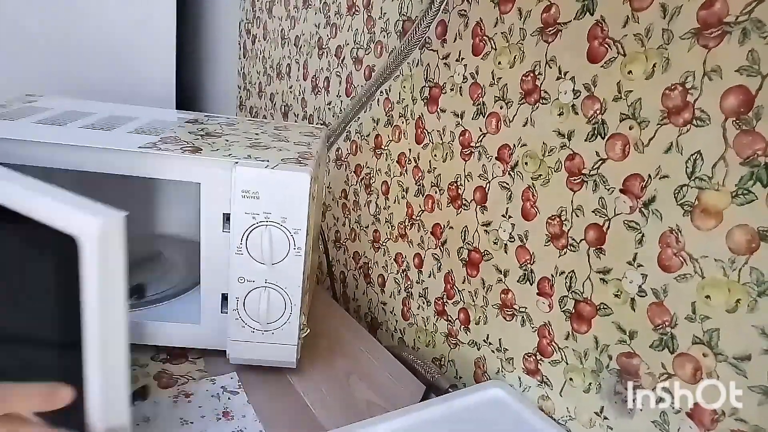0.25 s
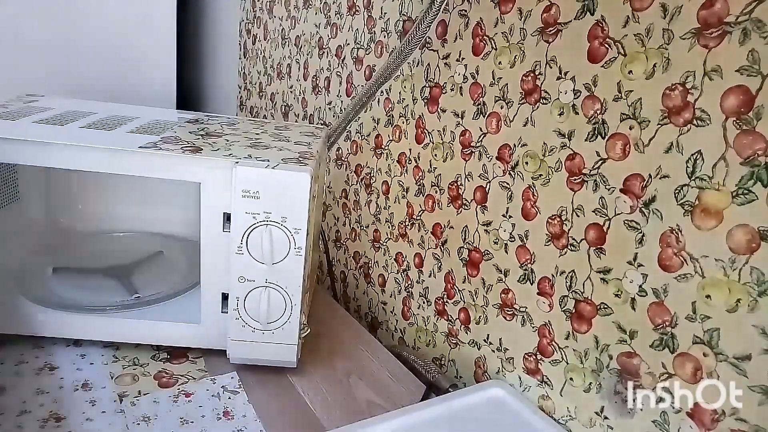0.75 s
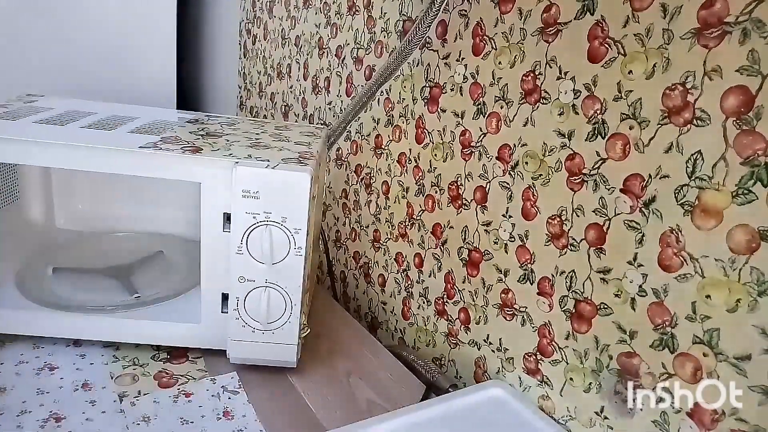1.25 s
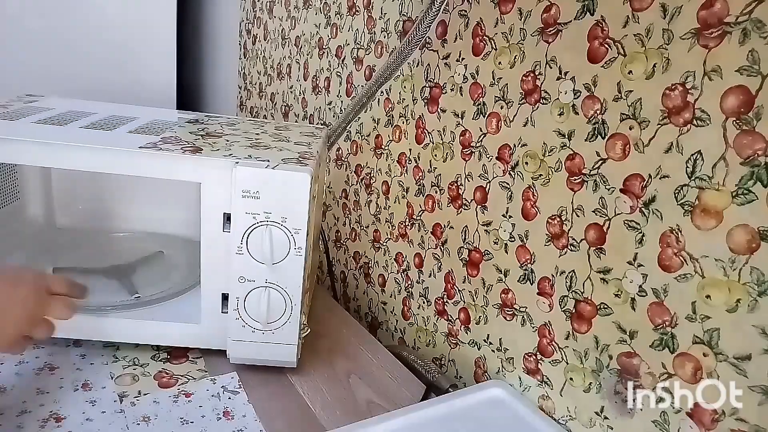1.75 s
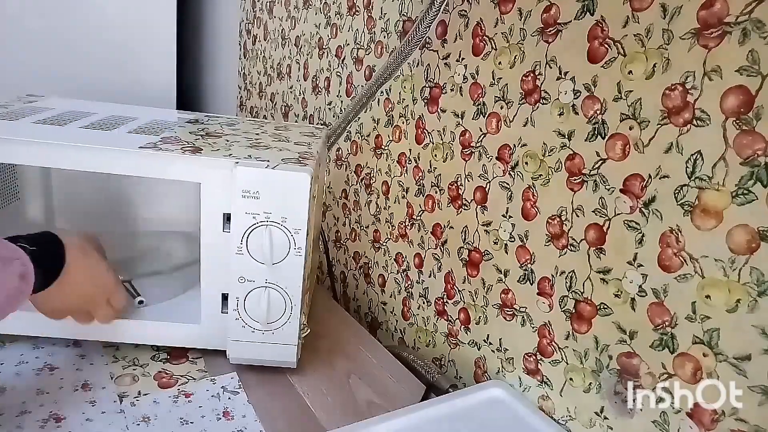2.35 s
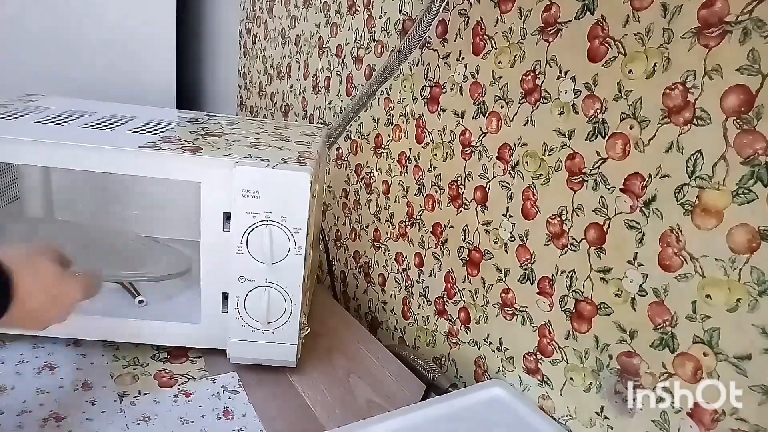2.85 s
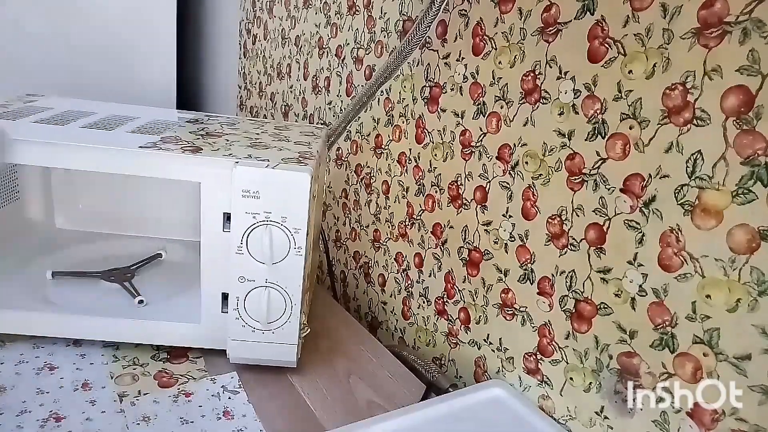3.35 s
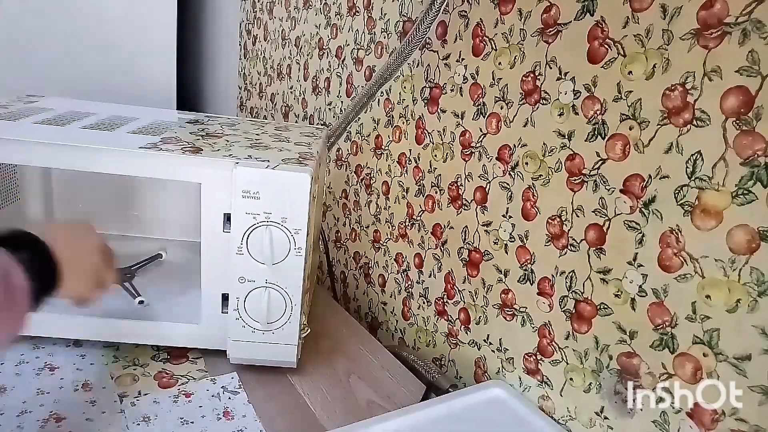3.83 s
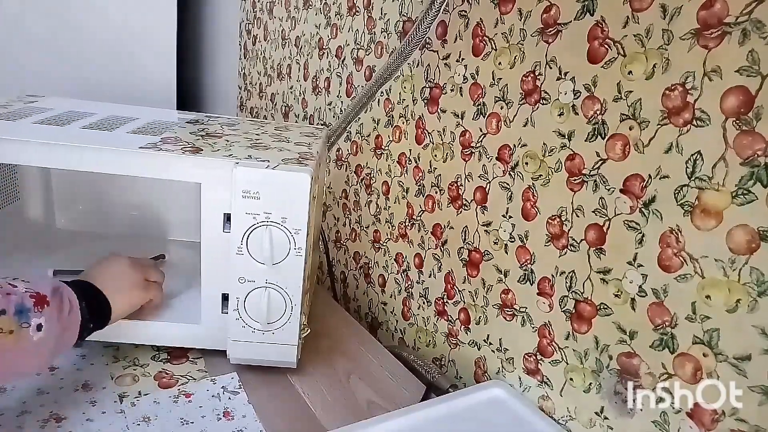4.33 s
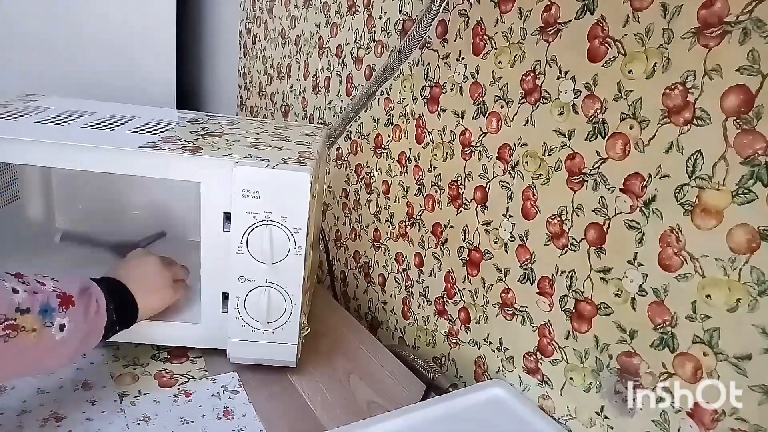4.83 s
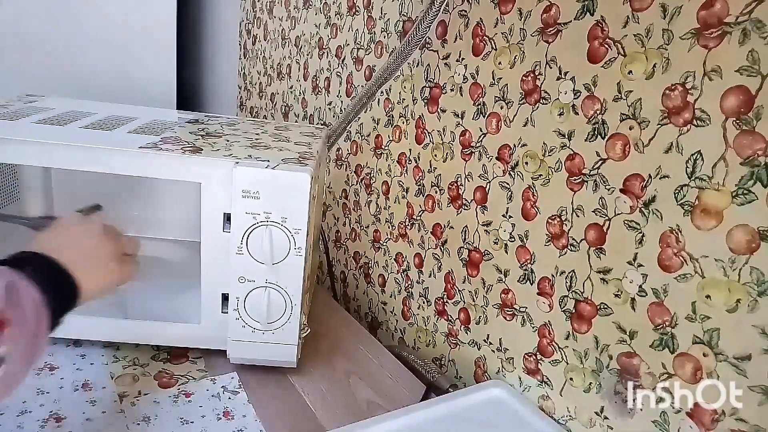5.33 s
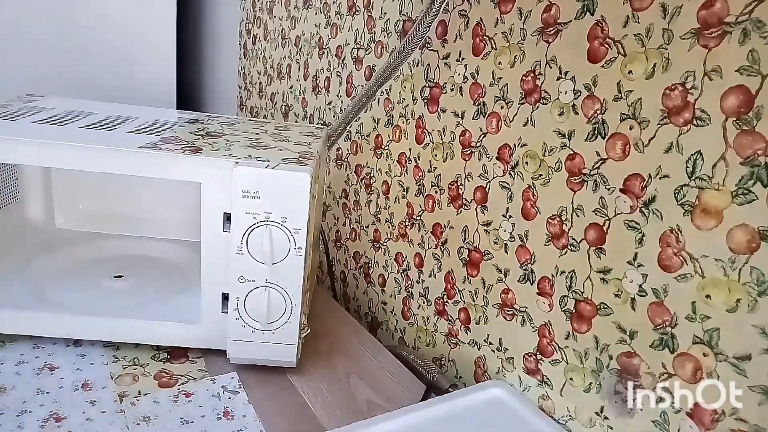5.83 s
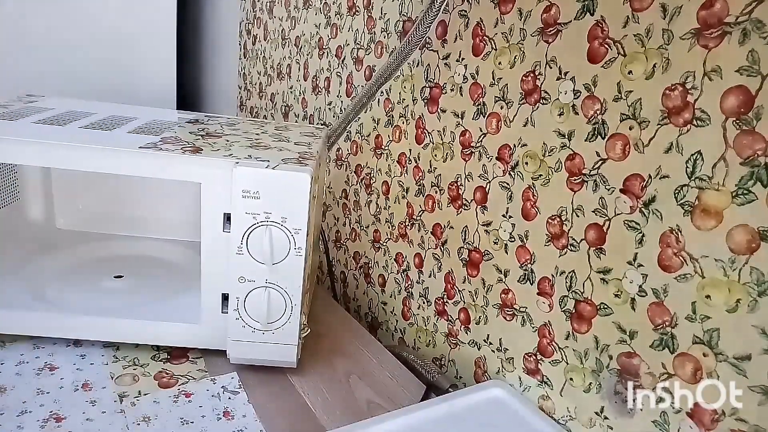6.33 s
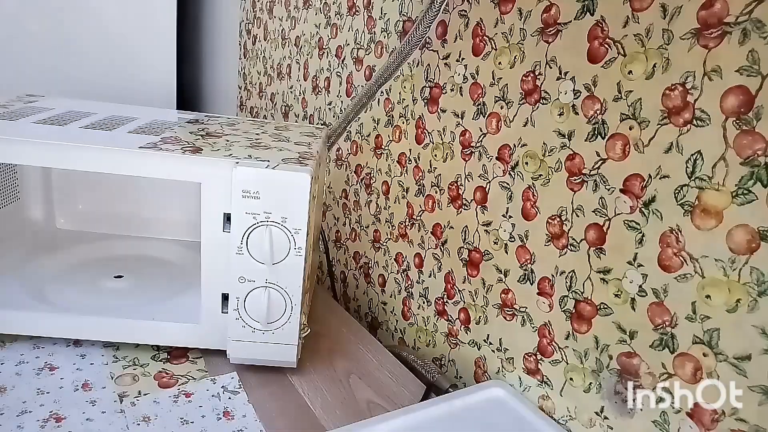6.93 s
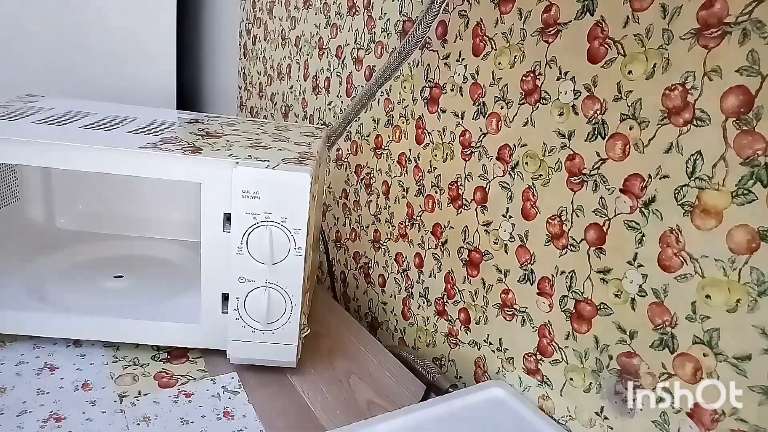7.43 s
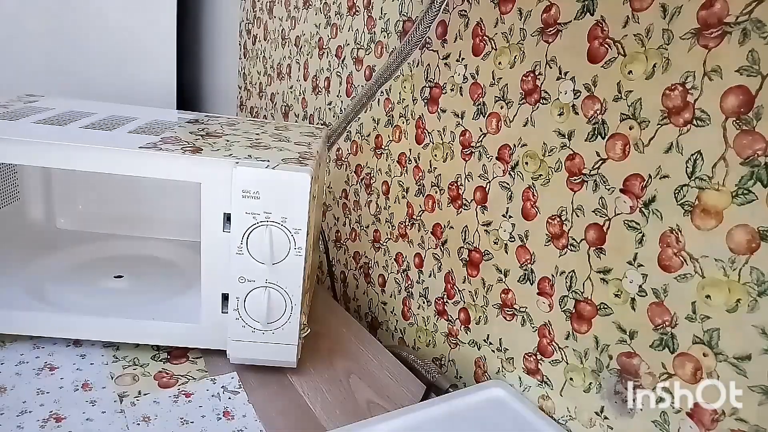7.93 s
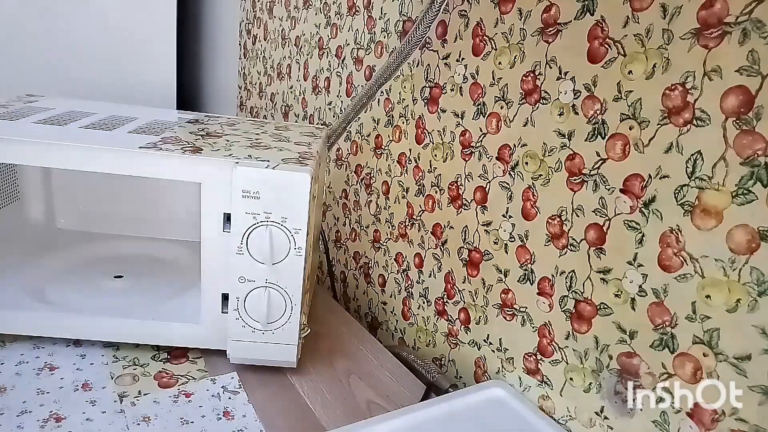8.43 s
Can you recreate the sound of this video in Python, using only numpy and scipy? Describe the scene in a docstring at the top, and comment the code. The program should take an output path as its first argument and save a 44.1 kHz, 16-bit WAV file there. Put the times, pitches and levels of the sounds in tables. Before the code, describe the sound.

In a small kitchen, a microwave door swings open with soft, dull thuds and a rustle of sleeves. The glass turntable plate bumps the steel cavity, making the thin walls boom and rattle. A plastic roller ring clacks and its little wheels tinkle. Then the plate clinks in the hand, rings against a hard surface and rocks down flat. A soft rush with far traffic runs underneath.

```python
"""Soft, dull thuds and a rustle of sleeves: a microwave door swings open in a small kitchen.
The glass turntable plate bumps the steel cavity on its way out, and the thin walls boom and rattle.
The plastic roller ring clacks as it is picked up, its loose wheels tinkling. Then the plate clinks
in the hand, rings as its edge strikes a hard surface, and rocks down flat in a duller clatter.
Under it all runs a soft background rush with far traffic."""
import sys
import numpy as np
from scipy import signal
from scipy.fft import rfft, irfft, next_fast_len
from scipy.io import wavfile
from scipy.ndimage import map_coordinates

SR = 44100
rng = np.random.default_rng(int(sys.argv[2]) if len(sys.argv) > 2 else 0)


def transcribe(u):
    """Save the signal u as a 16-bit wav file named by the first command-line argument.

    u: samples, shape (n,) or (channels, n), limited to [-1, 1]; the rate is SR.
    q: integer samples, one column per channel.
    """
    v = np.clip(np.atleast_2d(u).T, -1, 1)
    q = np.round(v * 32767).astype(np.int16)
    wavfile.write(sys.argv[1], SR, q)


N = 382347
HIT = 2 * SR // 3  # samples in one contact and its tail

# modes of the oven's steel panels: (frequency [Hz], relative level [dB], t60 before damping [s])
PANEL_MODES = [(94.8, -18.5, 0.98), (188.2, -6.5, 0.7), (206, 4.5, 0.071), (240.1, 6.5, 0.47),
               (252, -9, 0.11)]


def amp(db):
    """Decibels to gain."""
    return 10 ** (np.asarray(db) / 20)


def unit(x):
    """Scale to rms 1."""
    return x / np.sqrt(np.mean(x ** 2) + 1e-20)


def early(x):
    """Scale a hit to rms 1 over its first 20 ms."""
    return x / np.sqrt(np.mean(x[:SR // 50] ** 2) + 1e-20)


def along(points, hz):
    """Read (frequency [Hz], value) points on a log frequency axis."""
    point_hz, values = np.transpose(points)
    return np.interp(np.log(hz + 1), np.log(point_hz + 1), values)


def wobble(rate):
    """A smooth random curve, rate knots a second."""
    return map_coordinates(rng.standard_normal(int(N * rate / SR) + 4), [np.arange(N) * rate / SR])


def filtered(x, response):
    """Shape x with a gain that depends on frequency."""
    size = next_fast_len(len(x) + SR // 4)
    return irfft(rfft(x, size) * response(np.fft.rfftfreq(size, 1 / SR)), size)[:len(x)]


def noise(spectrum, size):
    """Noise of rms 1 with the given colour."""
    return unit(filtered(rng.standard_normal(size), lambda hz: amp(along(spectrum, hz))))


def modal(spectrum, depth_db, width_hz):
    """Lay a body's dense, fixed resonances over its broad colour."""
    hz = np.linspace(0, SR / 2, 4096)
    peaks = map_coordinates(rng.standard_normal(4096), [hz / width_hz], mode="wrap")
    return np.column_stack([hz, along(spectrum, hz) + depth_db * peaks * hz / (hz + 400)])


def patchy(x, depth_db, patch_hz, patch_s):
    """Shifting patches of colour: a random gain drifts over frequency and time."""
    hz, t, spectra = signal.stft(x, SR, nperseg=512)
    spots = np.meshgrid(hz / patch_hz, t / patch_s, indexing="ij")
    field = map_coordinates(rng.standard_normal((64, 256)), spots, order=1, mode="wrap")
    return unit(signal.istft(spectra * amp(depth_db * field), SR, nperseg=512)[1][:N])


def ring(modes, damping, waver, direct_db=3):
    """Fading modes: clean as they first arrive, then wavering as wall reflections join in."""
    out, t = np.zeros(HIT), np.arange(HIT) / SR
    knots = np.linspace(0, t[-1], 32)
    depth = .7 * np.tanh(waver / .7) * (1 - np.exp(-knots / .02))
    for hz, db, t60 in modes:
        swell, phase = depth * rng.standard_normal((2, len(knots)))
        decay = np.exp(-np.log(1000) * t * damping / t60)
        level = np.interp(t, knots, 1 + swell) * amp(db + rng.normal(0, 1.2)) * decay
        out += level * np.sin(2 * np.pi * hz * t + np.interp(t, knots, phase))
    return early(out * amp(direct_db * np.exp(-t / 0.025)))


def clatter(spectrum, damping, crack):
    """A short crack, then countless small modes and echoes, each band dying at its own rate."""
    # the kitchen's decay: (frequency [Hz], t60 before damping [s])
    kitchen_decay = [(100, 0.36), (300, 0.56), (1000, 0.44), (3000, 0.41), (6000, 0.31), (9000, 0.16),
                     (15000, 0.43)]
    hz, t, spectra = signal.stft(noise(spectrum, HIT), SR, nperseg=256)
    decay = amp(-60 * t * damping / along(kitchen_decay, hz)[:, None])
    tail = signal.istft(spectra * decay, SR, nperseg=256)[1][:HIT]
    return early(tail * (1 + crack * np.exp(-np.arange(HIT) / SR / 0.0092)))


def strikes(rows, sound, low_hz, high_hz, attack_s, swell_s, brighten=0.37):
    """A new sound for each contact; where and how hard it lands sets its low, middle and high share."""
    out, t = np.zeros(N + HIT), np.arange(HIT) / SR
    hz = np.fft.rfftfreq(2 * HIT, 1 / SR)
    below_low, below_high = 1 / (1 + (hz / [[low_hz], [high_hz]]) ** 12)
    crossover = [below_low, below_high - below_low, 1 - below_high]
    rise = 1 - np.exp(-t / np.array([[swell_s], [attack_s], [attack_s]]))  # low modes build more slowly
    top = np.clip((hz - 6500) / 6000, 0, 1)
    for s, *levels in rows:
        hardness = amp(brighten * (levels[-1] + 34) * top)  # a harder contact is shorter, so brighter
        bands = irfft(rfft(sound(), 2 * HIT) * hardness * crossover)[:, :HIT] * rise
        out[round(s * SR):][:HIT] += sum(amp(db) * early(band) for db, band in zip(levels, bands))
    return out[:N]


def pings(rows, modes, waver, attack_s):
    """Contacts so light that only the ringing is heard."""
    out, t = np.zeros(N + HIT), np.arange(HIT) / SR
    rise = 1 - np.exp(-t / attack_s)
    for s, db in rows:
        out[round(s * SR):][:HIT] += amp(db) * ring(modes, damping=0.93, waver=waver) * rise
    return out[:N]


def room_tone():
    """A soft, slowly drifting rush fills the kitchen's resonances."""
    # slow drift of the rush: (time [s], level [dB])
    drift = [(0, -48), (1.45, -46.5), (1.85, -48.5), (2.45, -44), (2.95, -51), (3.7, -50.5), (4.7, -47),
             (6.3, -48), (6.95, -50), (8.1, -50.5), (8.67, -47.5)]
    # colour of the rush: (frequency [Hz], relative level [dB])
    rush_colour = [(20, -42), (55, -41), (85, -13.5), (125, -8), (190, -13), (260, -15.5), (420, -14.5),
                   (540, -4), (740, -6), (900, -6.5), (1000, -2.5), (1260, -2.5), (1380, -4.5),
                   (1750, -7.5), (2000, -10.5), (2700, -23.5), (3500, -32.5), (6800, -36.5), (7900, -49),
                   (15500, -46.5)]
    drift_db = np.interp(np.arange(N) / SR, *np.transpose(drift))
    return amp(drift_db + 0.4 * wobble(5.8)) * noise(modal(rush_colour, depth_db=3, width_hz=38), N)


def traffic():
    """Tyre noise and rumble of each far vehicle fall off with its distance."""
    # passing vehicles: (time when nearest [s], tyre level [dB], rumble level [dB])
    passes = [(1.3, -59, -82), (5.85, -45, -64.5), (7.3, -64, -51.5), (8.6, -51.5, -60)]
    # tyres on the road: (frequency [Hz], relative level [dB])
    tyre_colour = [(300, -57), (750, -19.5), (1020, 0), (1250, -12.5), (2000, -19.5), (4000, -61.5)]
    # vehicle rumble: (frequency [Hz], relative level [dB])
    rumble_colour = [(20, -17), (45, -16), (70, -4.5), (130, -4.5), (250, -15), (600, -8.5), (2000, -68)]
    road_distance_m, speed_m_per_s = 7.2, 16.6
    nearest_s, tyre_db, rumble_db = np.transpose(passes)[:, :, None]
    along_road_m = speed_m_per_s * (np.arange(N) / SR - nearest_s)
    nearness = road_distance_m / np.hypot(road_distance_m, along_road_m)
    heard = lambda db: np.linalg.norm(amp(db) * nearness, axis=0)  # vehicles add in power
    return heard(tyre_db) * noise(tyre_colour, N) + heard(rumble_db) * noise(rumble_colour, N)


def sleeves():
    """Cloth fibres brush past each other in an uneven hiss that shifts in colour as the folds move."""
    # rubbing cloth: (frequency [Hz], relative level [dB])
    cloth_colour = [(1180, -14.5), (2000, -3.5), (2200, 2.5), (3610, -1.5), (4180, -1.5), (4510, -4.5),
                    (5990, 1.5), (9510, -27), (15500, -38)]
    # one brush per arm movement: (peak time [s], level [dB], swell time [s])
    brushes = [(.06, -53, 0.24), (.56, -58, 0.32), (.71, -47.5, 0.12), (1.26, -57.5, 0.52),
               (1.52, -56.5, 0.055), (2.04, -46.5, 0.16), (2.58, -49, 0.11), (3.7, -69.5, 0.55),
               (4.62, -58, 0.33), (5.03, -61, 0.26), (5.71, -59, 0.051), (5.92, -57.5, 0.75),
               (6.54, -39, 0.16), (6.9, -59, 0.36), (7.85, -59.5, 0.24), (8.37, -63.5, 0.56)]
    rise_db, fall_db = 13.5, 12.5  # drop one swell time before and after the peak
    roundness = 1.43  # 1 = pointed, 2 = bell
    t, power = np.arange(N) / SR, np.zeros(N)
    for s, db, swell_s in brushes:
        drop_db = np.where(t < s, rise_db, fall_db) * np.abs((t - s) / swell_s) ** roundness
        power += amp(db - np.minimum(drop_db, 100)) ** 2
    hiss = noise(modal(cloth_colour, depth_db=2.6, width_hz=60), N)
    rustle = patchy(hiss, depth_db=1.8, patch_hz=1400, patch_s=.09)
    return np.sqrt(power) * amp(0.74 * wobble(60)) * rustle


def door():
    """The door swings open on its hinges with dull, soft-edged thuds."""
    # hinge thuds: (time [s], level [dB])
    thuds = [(.005, -49.5), (.45, -53.5), (.74, -55)]
    # the door's body: (frequency [Hz], relative level [dB])
    door_colour = [(40, -32), (100, 5), (140, -8), (190, -1.5), (260, -18), (370, -10), (700, -36),
                   (3000, -70)]
    out, t = np.zeros(N + HIT), np.arange(HIT) / SR
    rise = 1 - np.exp(-t / 0.015)
    for s, db in thuds:
        out[round(s * SR):][:HIT] += amp(db) * clatter(door_colour, damping=0.76, crack=0) * rise
    return out[:N]


def roller_ring():
    """The light plastic ring clacks, the oven floor answers, and the little wheels tinkle."""
    # the ring is handled: (time [s], panel boom [dB], clatter [dB], edge [dB])
    contacts = [(4.101, -46.5, -33, -30), (4.117, -40.5, -32.5, -30), (4.229, -45, -40.5, -43),
                (4.471, -52, -50, -64), (4.522, -46, -41.5, -45.5), (4.547, -42, -43.5, -51),
                (4.639, -47.5, -46, -66), (4.778, -47, -46, -58), (4.799, -41.5, -38.5, -41)]
    # a plastic clack: (frequency [Hz], relative level [dB])
    plastic_colour = [(35, -48), (60, -13), (179, 0), (231, 2), (413, -11.5), (509, -4), (931, -9),
                      (1020, 3), (1150, -6), (1630, -5), (2010, -9.5), (4030, -16.5), (5980, -16),
                      (8470, -34.5), (15500, -51)]
    # the ring on the oven floor: (frequency [Hz], relative level [dB], t60 before damping [s])
    roller_modes = [(671, -4, 0.51), (1050, 3, 0.18), (2440, -8, 0.21), (2550, -6.5, 0.28),
                    (3130, -7, 0.32), (3500, -4, 0.17), (4270, -2, 0.18), (4420, -13, 0.38),
                    (4670, -26, 0.25), (6070, -1, 0.076), (6870, -2.5, 0.09)]
    # the loose wheels tinkle: (time [s], level [dB])
    tinkles = [(4.4443, -54.5), (4.8044, -45), (4.8446, -42.5), (4.8719, -45.5), (4.9143, -46.5),
               (4.975, -56), (5.6964, -50)]
    # the wheels: (frequency [Hz], relative level [dB], t60 before damping [s])
    wheel_modes = [(4054, -10, 0.19), (4360, -15, .22), (5670, -1, 0.058), (5800, 6.5, 0.038),
                   (5960, 2, 0.15), (6300, -9, 0.25), (6500, -7, 0.2), (7050, -16, 0.1), (8000, -24, 0.16),
                   (10000, -26, 0.15)]
    plastic = modal(plastic_colour, depth_db=4, width_hz=37)

    def clack():
        tone = amp(-6.5) * ring(roller_modes, damping=1.5, waver=0.69, direct_db=-1)
        snap = clatter(plastic, damping=0.9, crack=0.48)
        floor = amp(-4) * ring(PANEL_MODES, damping=1.86, waver=0.31, direct_db=-0.5)
        return tone + snap + floor

    clacks = strikes(contacts, clack, low_hz=405, high_hz=3060, attack_s=0.0012, swell_s=0.005)
    return clacks + pings(tinkles, wheel_modes, waver=1, attack_s=0.00099)


def oven_bumps():
    """The heavy plate sets the thin steel walls booming and rattles in the cavity."""
    # the plate bumps the oven: (time [s], panel boom [dB], clatter [dB], edge [dB])
    contacts = [(2.074, -38.5, -45.5, -50.5), (2.137, -33, -32, -45.5), (2.217, -29, -31, -36),
                (2.224, -17, -33.5, -53), (2.245, -39, -22.5, -32), (2.267, -25, -21, -32),
                (2.321, -28, -28.5, -36.5), (2.35, -31, -35, -43.5), (2.393, -33, -52, -65),
                (2.467, -19.5, -32, -40), (2.484, -31, -35, -43), (2.57, -22.5, -35.5, -41)]
    # the steel cavity: (frequency [Hz], relative level [dB])
    cavity_colour = [(18, -58), (30, -15), (53, -44), (92, -37), (144, -34), (173, 1), (237, -4),
                     (292, -18), (399, -17.5), (945, -16), (1080, -15), (3320, -25.5), (4090, -25.5),
                     (6720, -29), (15500, -99)]
    # plate and cavity rattling together: (frequency [Hz], relative level [dB], t60 before damping [s])
    rattle_modes = [(602, -3, 0.36), (801, -1, 0.38), (1055, -1.5, 0.27), (1270, 2, 0.31), (1370, -5, 0.4),
                    (1760, -1.5, 0.21), (2380, -2, 0.22), (2660, -8, 0.2), (2990, -9, 0.51),
                    (4240, -6, 0.35), (4060, -10, 0.28), (4500, -20, 0.3), (6050, -12, .25),
                    (9600, -33, 0.23), (11100, -39, 0.21)]
    cavity = modal(cavity_colour, depth_db=3, width_hz=45)

    def bump():
        boom = ring(PANEL_MODES, damping=1.4, waver=0.16, direct_db=5.5)
        rattle = amp(-9.5) * ring(rattle_modes, damping=1.35, waver=1, direct_db=1.5)
        return boom + rattle + amp(-2.5) * clatter(cavity, damping=0.92, crack=0.73)

    return strikes(contacts, bump, low_hz=430, high_hz=3250, attack_s=0.0018, swell_s=0.0043,
                   brighten=.15)


def plate_in_hand():
    """Gripped at the rim, the glass clinks only briefly."""
    # rim clinks: (time [s], body [dB], ring [dB], edge [dB])
    contacts = [(5.934, -47, -47, -41), (5.954, -51, -31.5, -38.5), (6.009, -44, -34, -31.5),
                (6.098, -41, -32.5, -36), (6.233, -50, -35, -46), (6.263, -47.5, -41, -44),
                (6.472, -43.5, -39.5, -35), (6.557, -45.5, -43, -36), (6.721, -39.5, -34, -27),
                (6.754, -52, -34, -49), (7.025, -46, -28, -25.5)]
    # a tap on the rim: (frequency [Hz], relative level [dB])
    rim_colour = [(290, -35), (500, -12), (863, -21), (1070, 6), (1620, -7), (2010, -25), (2360, -5.5),
                  (2570, -36), (2760, -8), (3480, -22), (4190, 5.5), (4910, -14), (5920, 5.5), (7450, -15),
                  (15500, -39)]
    # the gripped plate: (frequency [Hz], relative level [dB], t60 before damping [s])
    gripped_modes = [(1096, 9, 0.23), (1610, 1, 0.32), (2350, -10, 0.47), (2778, 3, .29), (4080, -9, 0.24),
                     (4100, 4, 0.32), (4360, 6, 0.21), (5795, 7.5, .2), (5960, -14, 0.12), (6140, -2, .25),
                     (6800, -9, 0.44), (6980, -9, 0.3), (8000, -13, .22), (9300, -22, .25),
                     (10800, -18, .2)]
    rim = modal(rim_colour, depth_db=3, width_hz=45)

    def clink():
        glass = ring(gripped_modes, damping=1, waver=1, direct_db=3.5)
        return glass + amp(-3.5) * clatter(rim, damping=0.94, crack=0.89)

    return strikes(contacts, clink, low_hz=1920, high_hz=3960, attack_s=0.00096, swell_s=.003)


def plate_ringing():
    """Touched softly, the glass sings; let down on its edge, it rings on and shakes what it meets."""
    # the edge strikes a hard surface: (time [s], body [dB], ring [dB], edge [dB])
    contacts = [(7.054, -25, -15.5, -26), (7.085, -32, -52, -38.5), (7.13, -30, -28.5, -41),
                (7.255, -25, -17, -32), (7.279, -23.5, -56, -32.5), (7.317, -20.5, -24.5, -41),
                (7.514, -54, -50, -46), (7.529, -30.5, -46, -37.5)]
    # the edge on that surface: (frequency [Hz], relative level [dB])
    surface_colour = [(35, -61.5), (60, -31), (370, -18), (640, -21.5), (1050, -4.5), (1420, -25),
                      (2100, -12), (2360, -13.5), (2530, -32), (2800, -4.5), (3250, -14.5), (3670, -27),
                      (4150, -5), (5200, -27), (6000, -11.5), (7500, -32.5), (11000, -47), (15500, -63)]
    # the plate on its support: (frequency [Hz], relative level [dB], t60 before damping [s])
    glass_modes = [(386, -18.5, 1), (442, -18, 0.71), (845, -14.5, 0.68), (949, -13, 0.98), (1071, 1, 0.33),
                   (2260, -14, 0.39), (2361, 5, 0.63), (2760, 0, 0.53), (2780, 1, 0.35), (2780, -14, 0.28),
                   (3370, -3, 0.089), (4050, -10, 0.62), (4205, -3.5, 0.54), (4310, -2, 0.094),
                   (5840, -6, 0.38), (6030, -16, 0.81), (6215, -22, .43), (6640, -25, .36),
                   (6900, -24, 0.68), (7800, -23, 0.37), (8000, -18.5, 0.28), (9470, -24.5, 0.26),
                   (10870, -23, .16), (11400, -30, 0.29)]
    # soft touches: (time [s], level [dB])
    touches = [(3.5235, -64), (7.5457, -28.5)]
    # the plate singing freely: (frequency [Hz], relative level [dB], t60 before damping [s])
    free_modes = [(2357, -1, 1), (4030, 0.5, 0.35), (4150, -20, .25), (5670, -22, 0.26), (6000, -21, 0.83),
                  (6740, -14, 0.36)]
    surface = modal(surface_colour, depth_db=5.5, width_hz=30)

    def blow():
        glass = ring(glass_modes, damping=1.23, waver=1, direct_db=-0.5)
        return glass + amp(-3) * clatter(surface, damping=0.66, crack=1.12)

    blows = strikes(contacts, blow, low_hz=1890, high_hz=3820, attack_s=0.00035, swell_s=0.0018)
    return blows + pings(touches, free_modes, waver=0.51, attack_s=0.0022)


def plate_landing():
    """Lying down flat damps the glass and drives the surface under it: a broad, dull clatter."""
    # the plate rocks down on its base: (time [s], thud [dB], clatter [dB], edge [dB])
    contacts = [(7.648, -29, -23.5, -33.5), (7.676, -45, -25.5, -39.5), (7.711, -28, -21.5, -37),
                (7.736, -40, -23, -30.5), (7.774, -44, -31, -36.5), (7.834, -60, -38, -49.5)]
    # the surface underneath: (frequency [Hz], relative level [dB])
    support_colour = [(59, -42), (100, -12), (293, -11.5), (362, -7), (614, -15.5), (917, -4), (1210, -11),
                      (2520, -20), (2870, -9.5), (3460, -29.5), (4190, -9), (4750, -37), (5870, -19.5),
                      (7410, -35.5), (15500, -59)]
    # plate and surface together: (frequency [Hz], relative level [dB], t60 before damping [s])
    flat_modes = [(381, -10, .51), (426, -14, 0.77), (678, -2, .35), (797, -8, 0.58), (915, -0.5, 0.76),
                  (1010, -9, .41), (1080, 0.5, 0.48), (1520, -7, .27), (1665, -2, .22), (1763, -6, 0.29),
                  (2160, -11, 0.24), (2358, -9, .49), (2815, -0.5, 0.46), (2784, 0, 0.4), (4010, -11, 0.51),
                  (4180, -7, 0.27), (4345, -14, 0.22), (5780, -6.5, 0.26), (6300, -12, 0.26)]
    support = modal(support_colour, depth_db=3, width_hz=35)

    def knock():
        glass = amp(-2) * ring(flat_modes, damping=1.1, waver=1, direct_db=0)
        return glass + clatter(support, damping=0.95, crack=1)

    return strikes(contacts, knock, low_hz=713, high_hz=3450, attack_s=0.00054, swell_s=0.00091,
                   brighten=0.55)


def scene():
    """Background, handling noises and the glass plate, mixed to mono."""
    bed = room_tone() + traffic()
    handling = sleeves() + door() + roller_ring()
    plate = oven_bumps() + plate_in_hand() + plate_ringing() + plate_landing()
    return (bed + handling + plate)[None]


def record(dry):
    """A brick-wall low-pass takes off the very top."""
    return np.array([filtered(x, lambda hz: hz < 15650) for x in dry])


dry = scene()
out = record(dry)
transcribe(out)
```